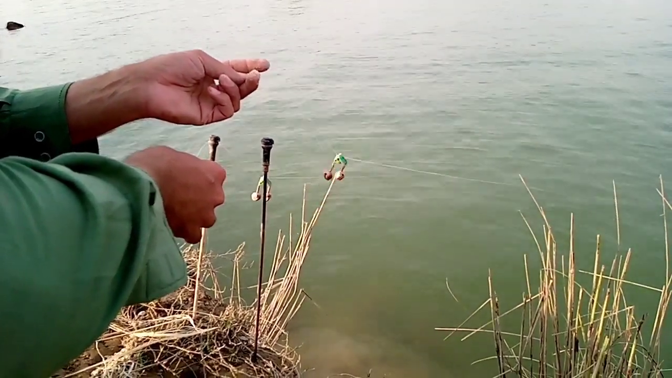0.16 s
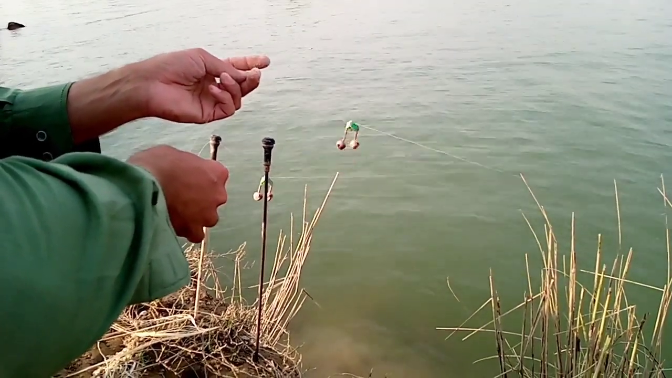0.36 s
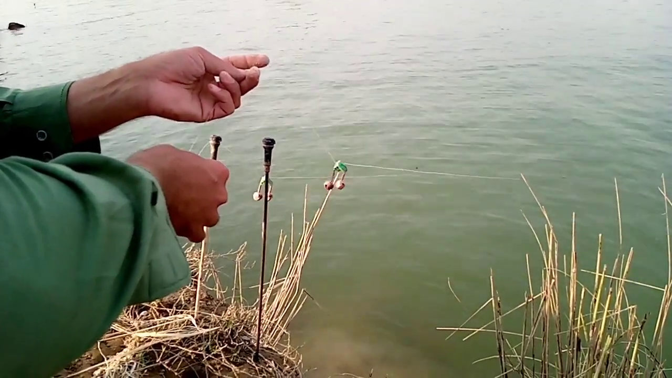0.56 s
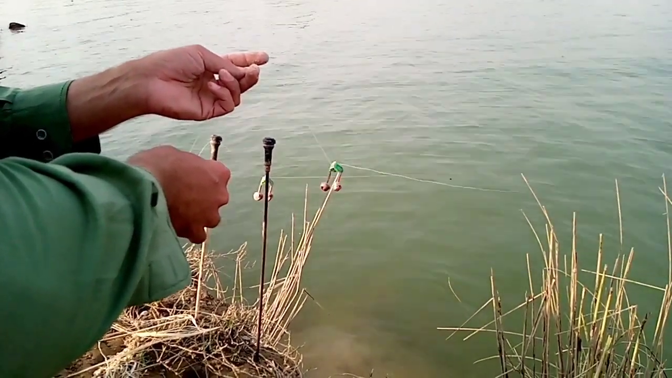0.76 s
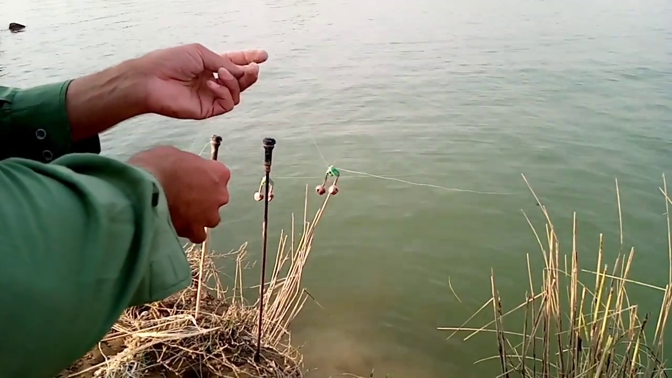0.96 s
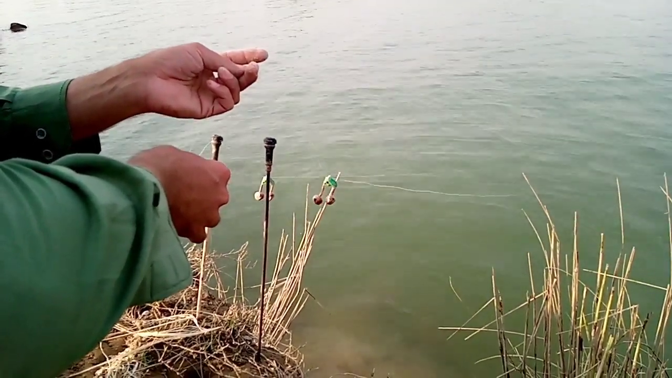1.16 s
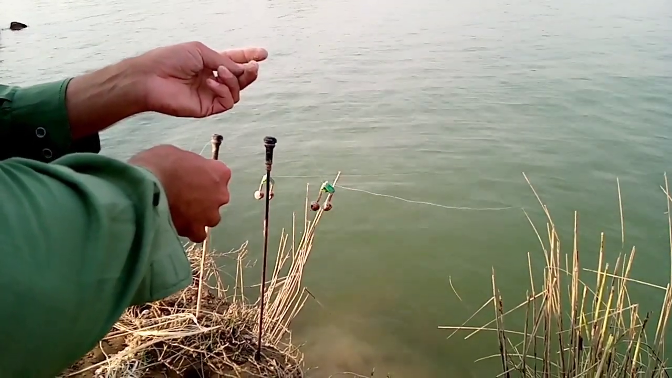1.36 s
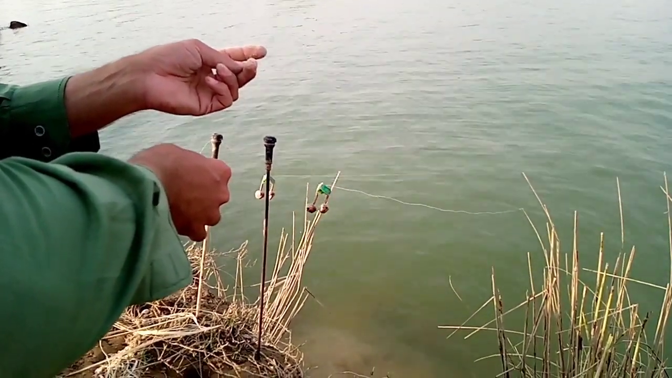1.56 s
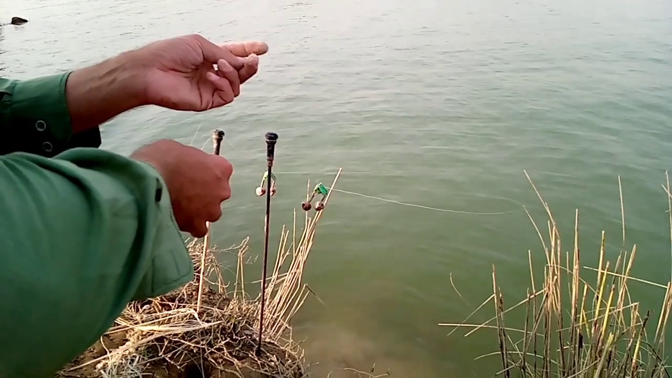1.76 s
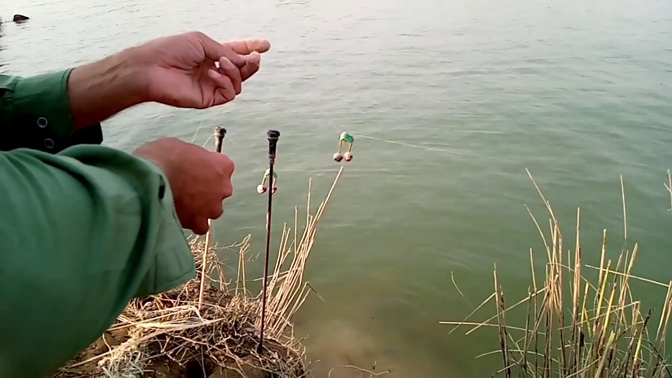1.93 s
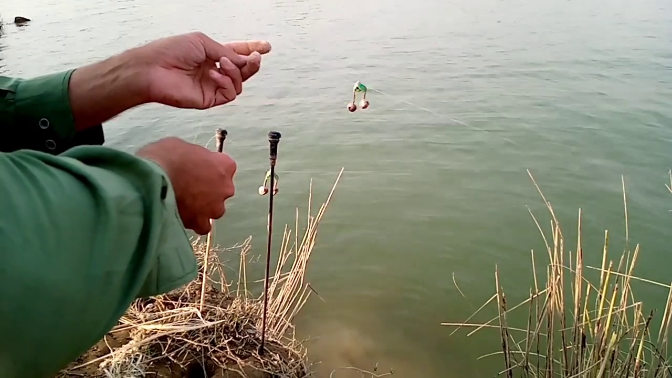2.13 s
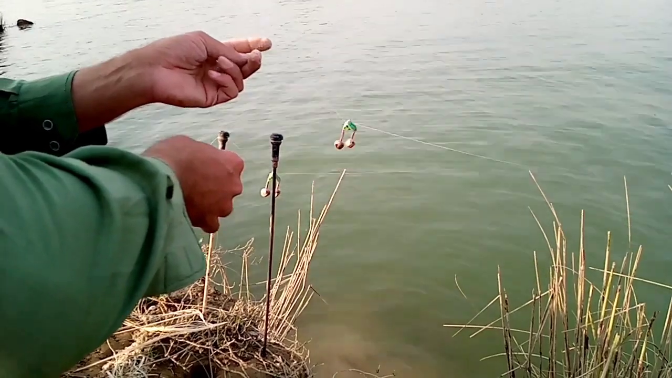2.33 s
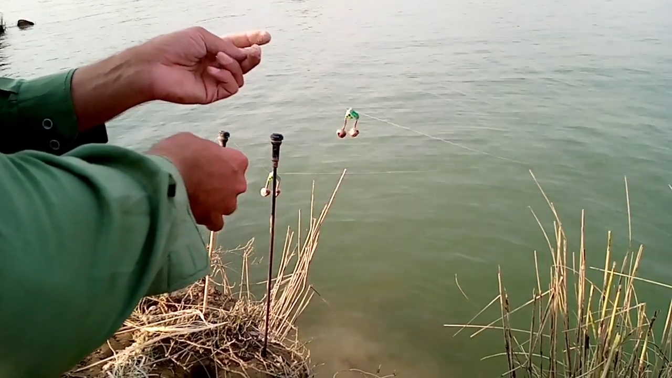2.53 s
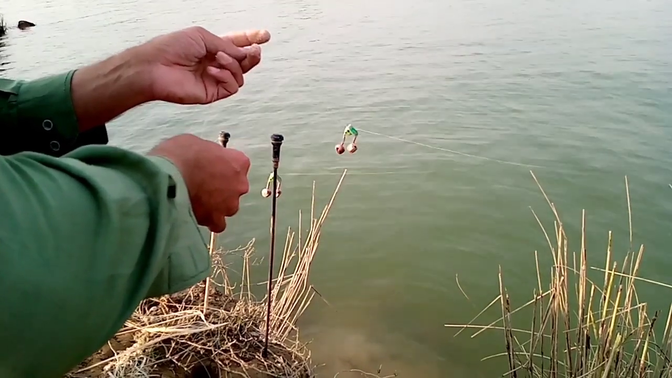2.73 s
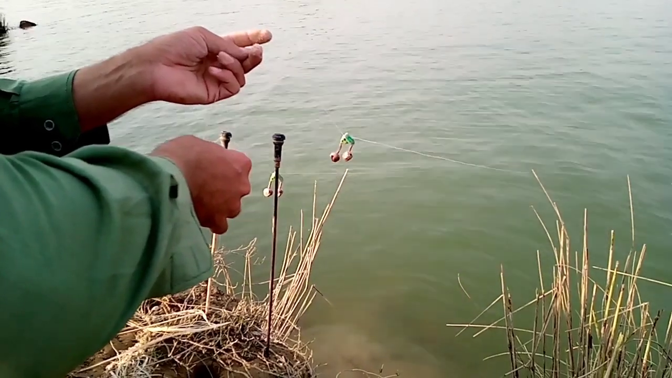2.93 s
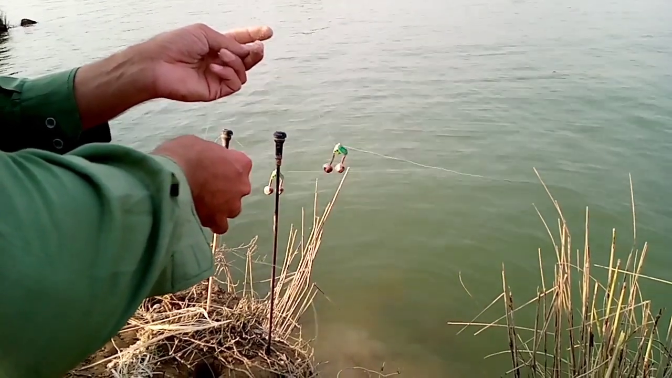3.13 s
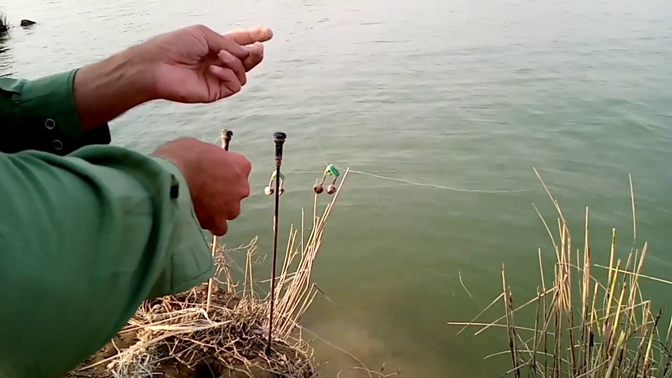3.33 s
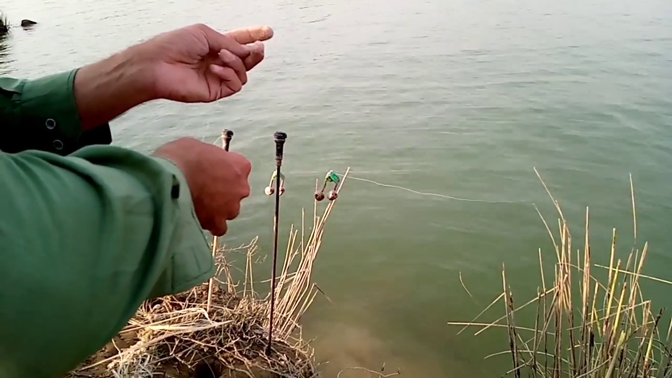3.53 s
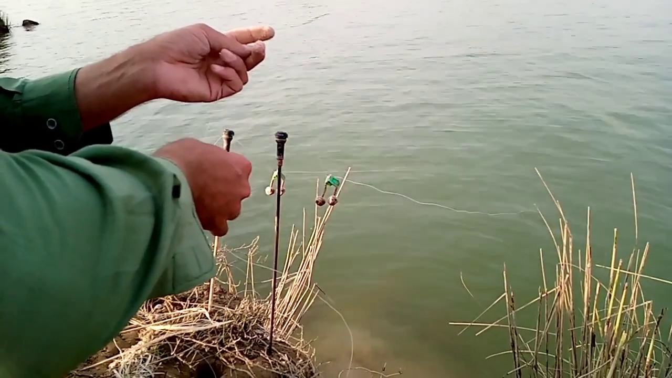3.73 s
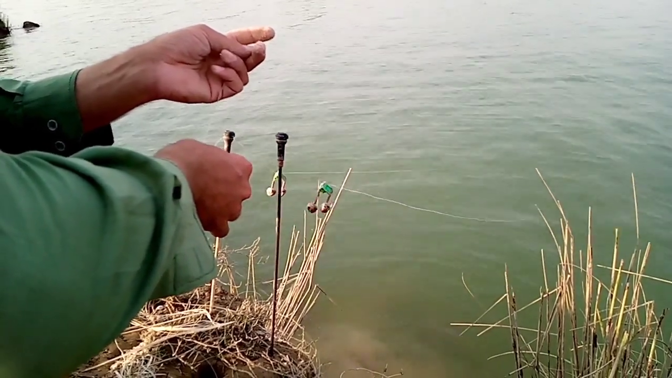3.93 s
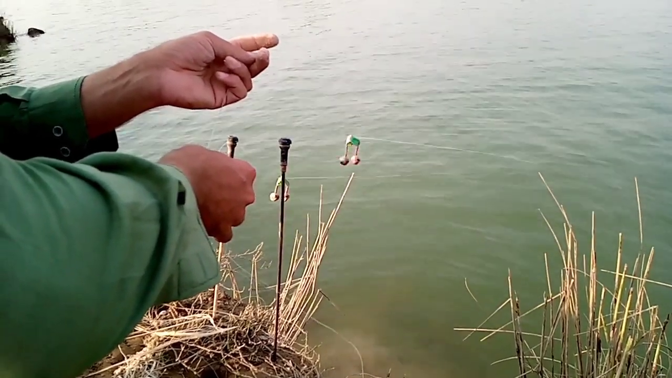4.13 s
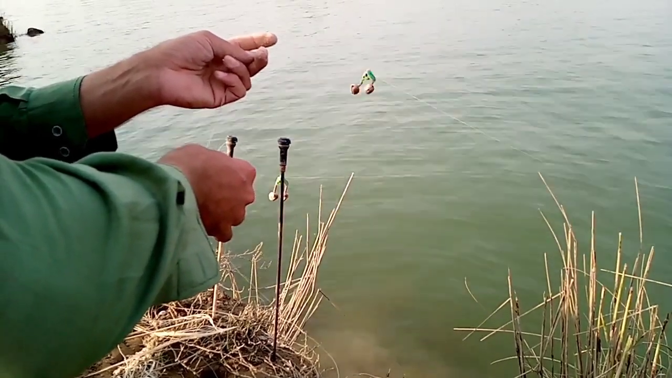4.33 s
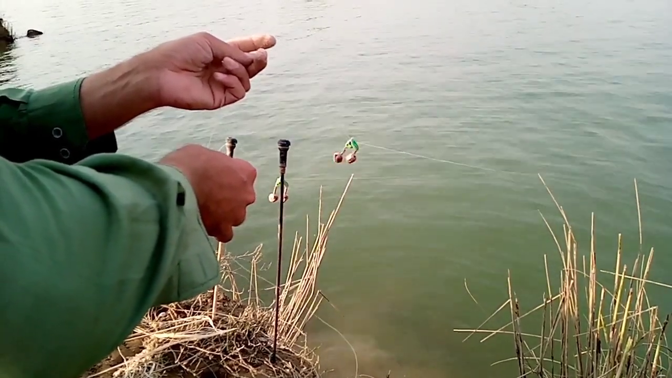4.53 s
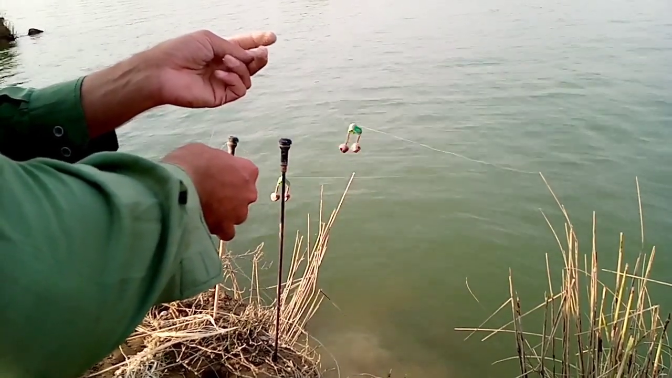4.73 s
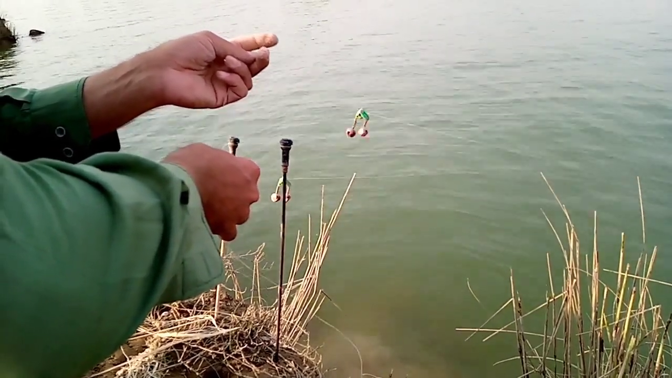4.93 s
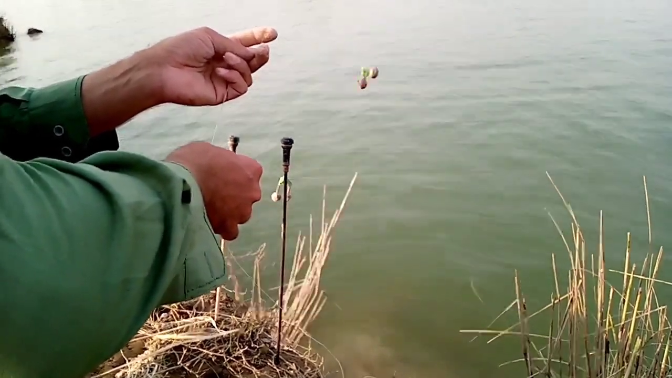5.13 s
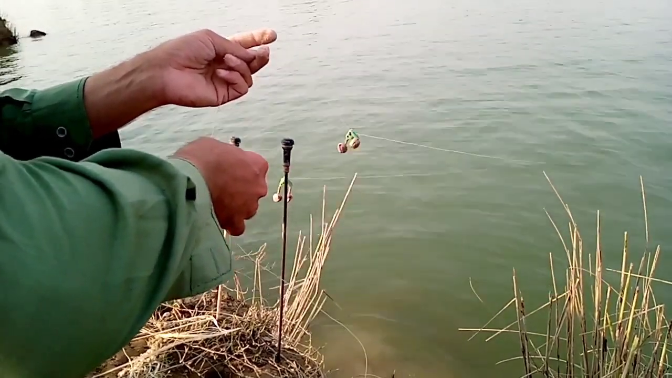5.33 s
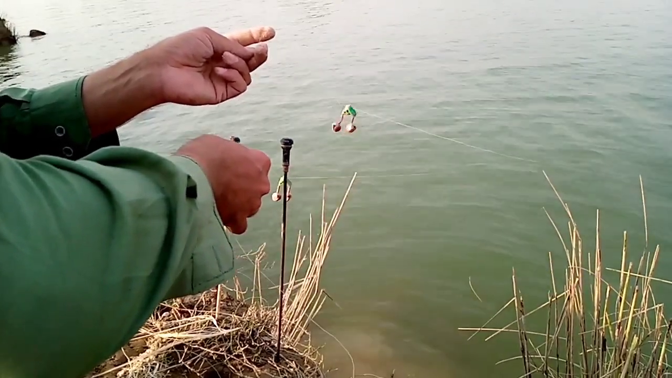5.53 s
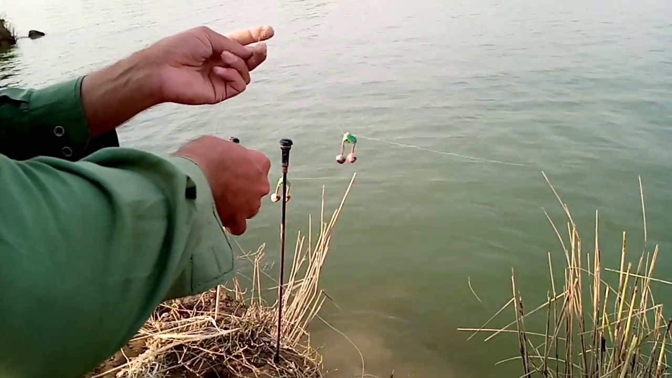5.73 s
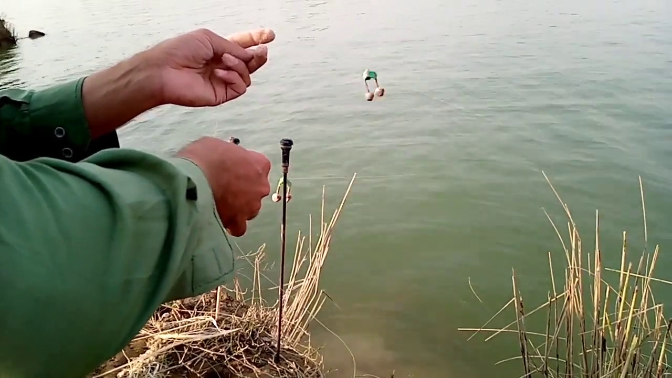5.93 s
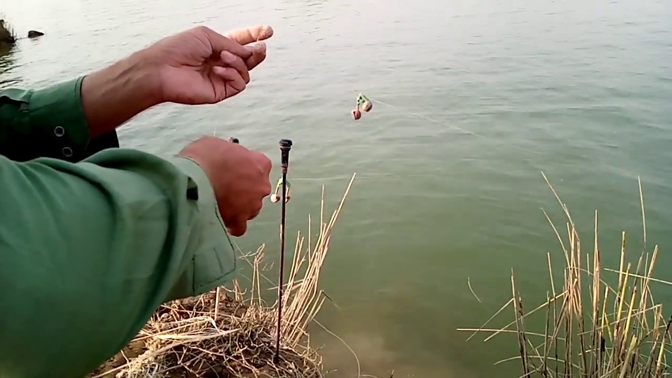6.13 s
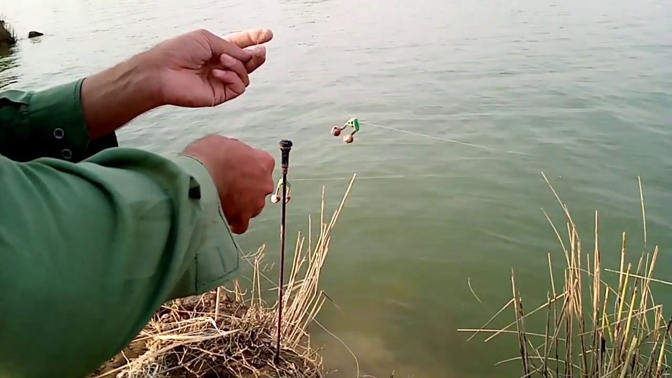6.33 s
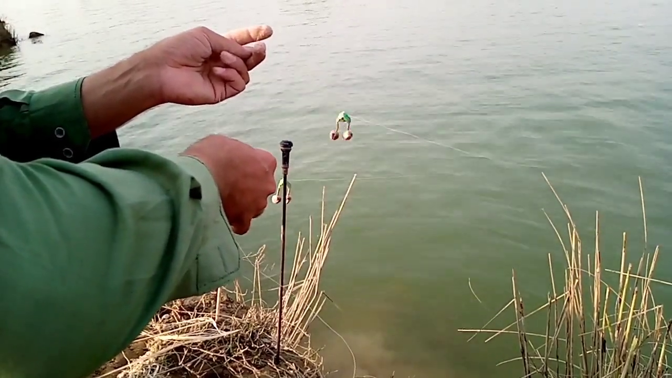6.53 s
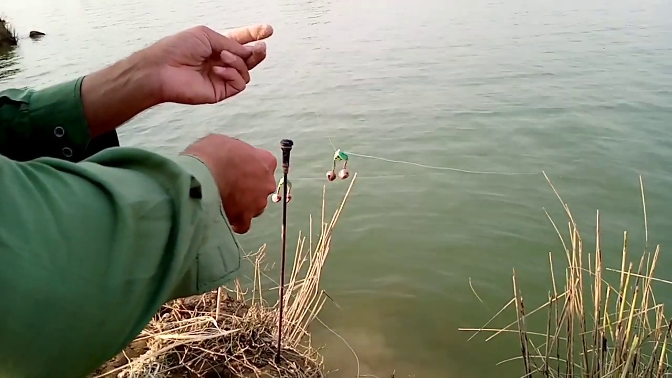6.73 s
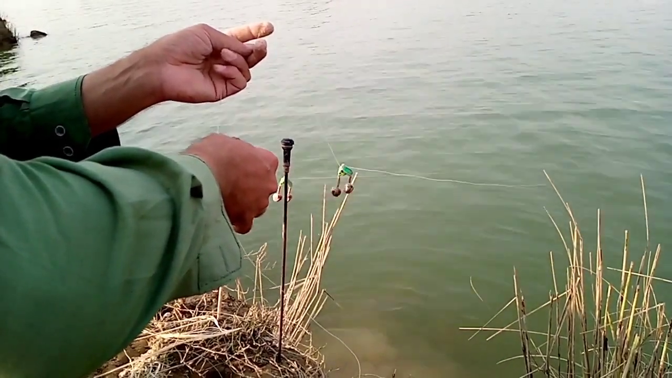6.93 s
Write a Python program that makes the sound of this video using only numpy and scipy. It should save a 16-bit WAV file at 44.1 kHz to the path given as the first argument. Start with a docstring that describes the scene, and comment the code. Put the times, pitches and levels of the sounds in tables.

```python
"""Two small pellet bells on a fishing line jingle in bursts as the line is twitched.
Each contact adds a skipping metal clack and a ring of four shell modes, whose two lower ones
are damped by the next contact while the overtones ring on. Gliding sines make cricket chirps and
an insect trill, noise puffs make dry reed ticks, and rising sine bubbles make lapping ripples.
Shaped noise gives open air, rustle and a low rumble, with faint whistles and one bird note far off."""
import sys
import numpy as np
from scipy import signal
from scipy.fft import rfft, irfft, next_fast_len
from scipy.io import wavfile
from scipy.ndimage import map_coordinates

SR = 44100
rng = np.random.default_rng(int(sys.argv[2]) if len(sys.argv) > 2 else 0)


def wav_record(signal):
    """Record a signal, one row per channel, as 16-bit PCM in the file named by sys.argv[1]."""
    frames = np.transpose(np.atleast_2d(signal))
    bounded = np.clip(frames, -1, 1)
    # unit amplitude maps onto the largest positive 16-bit level
    quanta = np.round(bounded * 32767).astype(np.int16)
    wavfile.write(sys.argv[1], SR, quanta)


N = 308259
TIME = np.arange(N) / SR


def from_db(db):
    """Decibels to gain."""
    return 10 ** (np.asarray(db) / 20)


def rms_one(x):
    """Scale to unit rms."""
    return x / np.sqrt(np.mean(x ** 2) + 1e-20)


def add(out, start_s, sound):
    """Mix a sound in at its start time."""
    at = min(max(round(start_s * SR), 0), N)
    out[at:at + len(sound)] += sound[:N - at]


def seconds(length_s):
    """Time axis of a short sound."""
    return np.arange(max(int(length_s * SR), 8)) / SR


def dying(t, t60):
    """Exponential decay that falls 60 dB in t60 seconds."""
    return np.exp(-np.log(1000) * t / max(t60, 1e-3))


def tone(hz):
    """A sine that follows a pitch curve from a random phase."""
    return np.sin(2 * np.pi * (np.cumsum(hz) / SR + rng.random()))


def drift(rate_hz, size=N):
    """Random curve: straight lines between normal draws at rate_hz."""
    knots = np.arange(size) / SR * rate_hz
    return map_coordinates(rng.standard_normal(int(knots[-1]) + 2), [knots], order=1)


def band(x, low_hz, high_hz):
    """Causal band-pass."""
    edges = [low_hz, min(high_hz, .45 * SR)]
    return signal.sosfilt(signal.butter(2, edges, "band", fs=SR, output="sos"), x)


def octave_noise(size, hz, octaves):
    """Unit-rms noise in a band given by centre and width in octaves."""
    half = 2 ** (octaves / 2)
    return rms_one(band(rng.standard_normal(size), hz / half, hz * half))


def resonate(x, hz, width_hz):
    """One resonance with gain 1 on top."""
    r = np.exp(-np.pi * width_hz / SR)
    poles = [1, -2 * r * np.cos(2 * np.pi * hz / SR), r * r]
    return signal.lfilter(np.array([1, 0, -1]) * (1 - r * r) / 2, poles, x)


def coloured_noise(spectrum):
    """Noise of unit rms with a given spectrum."""
    hz, db = np.transpose(spectrum)
    size = next_fast_len(N)
    bins = np.maximum(np.fft.rfftfreq(size, 1 / SR), 1)
    gain = from_db(np.interp(np.log(bins), np.log(hz), db))
    return rms_one(irfft(rfft(rng.standard_normal(size)) * gain, size)[:N])


# colour of the open air over the water: (f/Hz, relative level/dB)
AIR_SPECTRUM = [(160, -51), (280, -7), (830, -17), (1290, -28.5), (1900, -11.5), (2990, -21.5),
                (3910, -12.5), (4330, -10), (4700, -12), (5660, -15.5), (6810, 5.5), (7530, -17.5),
                (8470, -22.5), (15500, -25.5)]
# colour of the low rumble: (f/Hz, relative level/dB)
RUMBLE_SPECTRUM = [(13, -46.5), (22, -25), (27, -15), (49, -15), (108, 3.5), (136, 1), (249, -19),
                   (400, -29.5), (520, -38), (880, -120)]
# swell of the rumble, before its trim and lumps: (t/s, level/dB)
RUMBLE_SWELL = [(0.05, -64.5), (1.25, -69), (1.42, -63.5), (1.88, -69.5), (2.15, -63), (3.64, -69.5),
                (3.75, -62.5), (3.92, -76.5), (3.96, -65.5), (4.55, -73), (4.78, -59), (4.89, -70),
                (5.74, -64.5), (6.04, -73.5), (6.1, -63), (6.9, -70)]
# low hum within the rumble: (mean f/Hz, median sine peak/dB against the rumble's rms)
RUMBLE_HUM = [(64, -8), (97, -4)]


def background(air_db=-70, air_flicker_db=0.5, rumble_trim_db=-0.5, hum_waver=0.034):
    """Soft noise hiss of open air over a lumpy noise rumble with wavering sine hums."""
    air = from_db(air_db + air_flicker_db * drift(12)) * coloured_noise(AIR_SPECTRUM)
    hum = sum(from_db(db + 1.3 * drift(41)) * tone(hz * (1 + hum_waver * drift(36)))
              for hz, db in RUMBLE_HUM)
    lumps_db = 2.2 * drift(15)
    rumble_db = np.interp(TIME, *np.transpose(RUMBLE_SWELL)) + rumble_trim_db + lumps_db
    return air + from_db(rumble_db) * (coloured_noise(RUMBLE_SPECTRUM) + hum)


# uneven rustle of reeds farther along the bank: (band centre f/Hz, median level/dB)
RUSTLE_BANDS = [(420, -93.5), (560, -92), (850, -88.5), (1150, -93), (1500, -86.5), (1950, -86.5),
                (2600, -87.5), (3400, -86)]


def far_rustle(slow_db=4, slow_hz=9, fast_db=3, fast_hz=35, octaves=0.43):
    """Each noise band of the rustle swells and flutters on its own."""
    out = np.zeros(N)
    for hz, db in RUSTLE_BANDS:
        level_db = db + slow_db * drift(slow_hz) + fast_db * drift(fast_hz)
        out += from_db(level_db) * octave_noise(N, hz, octaves)
    return out


# overlapping runs of a few high and low crickets:
# (first chirp t/s, last chirp t/s, first f/Hz, last f/Hz, level/dB before level_db)
CRICKET_RUNS = [(0, 0.333, 7320, 7310, -67.5), (0.776, 1.677, 7140, 7410, -68),
                (1.965, 2.959, 7150, 7340, -67), (3.042, 3.731, 6970, 7100, -64.5),
                (3.877, 4.533, 7300, 7310, -66), (4.638, 5.089, 6970, 6980, -62.5),
                (5.143, 5.79, 7280, 7350, -68), (5.847, 6.407, 6920, 6980, -65),
                (6.501, 6.938, 7350, 7300, -67), (0.949, 1.411, 7100, 7180, -69.5),
                (0, 0.131, 6850, 6930, -64), (0.315, 0.906, 6590, 6640, -65),
                (1.462, 2.306, 6750, 6850, -62), (2.652, 3.243, 6690, 6590, -63.5),
                (3.874, 4.459, 6620, 6600, -64.5), (4.99, 5.581, 6750, 6670, -62),
                (6.19, 6.79, 6780, 6640, -61.5)]


def crickets(level_db=5.0, chirp_gap_s=.115, stroke_hz=72, sweep=0.081, duty=0.71, uneven_db=-0.87,
             wander=0.0027, scatter_db=-8, scatter_t60=0.044, strokes=4):
    """Even chirps creep in pitch; each is four falling wing strokes, scattered by the reeds."""
    out = np.zeros(N)
    t = seconds(duty / stroke_hz)
    through = t / t[-1]
    for first, last, first_hz, last_hz, db in CRICKET_RUNS:
        chirps = round((last - first) / chirp_gap_s) + 1
        times, pitches = np.linspace(first, last, chirps), np.linspace(first_hz, last_hz, chirps)
        for start, hz in zip(times, pitches):
            pitch = hz * (1 + wander * rng.normal() + sweep * (.5 - through))
            for k in range(strokes):
                gain = from_db(db + level_db + uneven_db * rng.normal())
                add(out, start + k / stroke_hz, gain * tone(pitch) * np.sin(np.pi * through))
    t = seconds(.1)
    echoes = rng.standard_normal(len(t)) * dying(t, scatter_t60)
    scatter = signal.fftconvolve(out, echoes / np.linalg.norm(echoes))[:N]
    return out + from_db(scatter_db) * scatter


# shimmer of farther insects: (f/Hz, width/Hz, median level/dB)
INSECT_CHORUS = [(6550, 350, -76.5), (6980, 290, -87)]
# thin insect trill: (start t/s, end t/s)
INSECT_TRILLS = [(.95, 1.3), (3.35, 3.9), (6.0, 6.75)]


def far_insects(flutter_db=6.0, trill_hz=7950, trill_db=-78.5, pulse_hz=60):
    """Distant singers blur into noise bands; a thin pulsed sine trill swells and fades."""
    out = np.zeros(N)
    for hz, width, db in INSECT_CHORUS:
        blur = rms_one(band(rng.standard_normal(N), hz - width / 2, hz + width / 2))
        out += from_db(db + flutter_db * drift(130)) * blur
    for start, end in INSECT_TRILLS:
        t = seconds(end - start)
        stroke = t * pulse_hz % 1
        # pulses tend to fall in pitch, with a random wander
        pitch = trill_hz * (1 + .03 * (.5 - stroke) + .005 * drift(pulse_hz, len(stroke)))
        swell = np.sqrt(np.abs(np.sin(np.pi * t / t[-1])))
        add(out, start, from_db(trill_db) * swell * np.sin(np.pi * stroke) ** 2 * tone(pitch))
    return out


def bubble(hz):
    """A tiny bubble rings briefly and rises in pitch."""
    t = seconds(110 / hz)
    attack = np.minimum(t * hz / 10, 1)
    return tone(hz * (1 + .06 * t / t[-1])) * dying(t, t[-1]) * attack


def ripples(floor_db=-74.0, count=240):
    """Wavelets lap the bank: scattered bubbles of many sizes, a few of them louder."""
    out = np.zeros(N)
    for when, size, chance in rng.random((count, 3)):
        hz = 480 + 2900 * size ** 1.1
        boost_db = -2.2 * np.log(chance + .03)
        add(out, when * N / SR, from_db(floor_db + boost_db) * bubble(hz))
    return out


def burst(db, hz, octaves, t60):
    """A dying puff of noise in one band."""
    t = seconds(.3)
    return from_db(db) * octave_noise(len(t), hz, octaves) * dying(t, t60)


# dry ticks of reeds and line: (t/s, level before decay/dB, centre f/Hz, width/octaves, t60/s)
REED_TICKS = [(0.161, -44.5, 3500, 0.53, 0.012), (0.162, -60, 1140, 0.64, 0.18),
              (1.071, -41.5, 8500, 0.24, 0.0091), (1.307, -57.5, 1470, 0.95, 0.08),
              (1.835, -47, 3130, 1.15, 0.018), (1.836, -49.5, 2280, 0.22, 0.045),
              (3.039, -54.5, 4940, .28, 0.058), (3.662, -56.5, 3500, 0.91, 0.14),
              (4.283, -57, 5440, 0.69, 0.057), (4.568, -51.5, 4480, 1.5, 0.024),
              (4.901, -53, 5460, 0.2, 0.13), (6.036, -51.5, 3200, .58, .1)]
# soft bumps on the bank: (t/s, level before decay/dB, centre f/Hz, width/octaves, t60/s)
BANK_BUMPS = [(4.754, -54, 182, 1.2, 0.23), (5.602, -56, 180, 0.64, 0.24)]


def reeds(crack_db=-9, crack_hz=7000, crack_octaves=0.7, crack_t60=0.021):
    """Dry noise ticks, each a bright crack over its own band, and soft low bumps."""
    out = np.zeros(N)
    for start, db, hz, octaves, t60 in REED_TICKS:
        add(out, start, burst(db, hz, octaves, t60))
        add(out, start, burst(db + crack_db, crack_hz, crack_octaves, crack_t60))
    for start, db, hz, octaves, t60 in BANK_BUMPS:
        add(out, start, burst(db, hz, octaves, t60))
    return out


# bigger wavelets that patter: (start t/s, end t/s, middle bubble f/Hz, middle level/dB)
WAVELETS = [(0.161, 0.299, 1237, -68.5), (1.07, 1.299, 1223, -69), (4.204, 4.416, 1355, -69),
            (5.754, 5.981, 1194, -66)]


def laps(spread_octaves=0.81, spread_db=3, count=22):
    """Each bigger wavelet sheds a quick cluster of bubbles."""
    out = np.zeros(N)
    for start, end, hz, db in WAVELETS:
        for when in np.linspace(start, end, count):
            size, strength, late = rng.uniform(-1, 1, 3)
            drop = from_db(db + spread_db * strength) * bubble(hz * 2 ** (spread_octaves * size))
            add(out, when + late * (end - start) / count, drop)
    return out


# damped resonances of a shell with the pellet on it, before load shift and scatter:
# (f/Hz, width/Hz, relative level/dB)
LOADED_SHELL = [(3700, 270, -1.5), (3987, 79, -5.5), (4168, 117, 6), (4437, 213, 12), (4657, 157, 7),
                (5026, 530, -5.5), (5130, 640, -22), (6550, 160, -43), (7650, 45, -20), (8750, 23, -30),
                (10850, 89, -32.5)]


def clatter(top_hz, bounce_s=.0016, fade_s=0.055, skip=0.38, load_shift=0.049, lowest_hz=3250,
            snap_db=-37, snap_hz=9000, count=12):
    """The pellet lands, then skips in quick, weakening bounces; energy of 10 ms at rms 1."""
    t = seconds(.05)
    when = np.r_[0, np.cumsum(bounce_s * rng.uniform(.3, 1.7, count))]
    clicks = np.zeros(len(t))
    places = np.minimum(when * SR, len(t) - 1).astype(int)
    clicks[places] = dying(when, 2 * fade_s) * np.r_[1, rng.laplace(0, skip, count)]
    # each landing place loads the shell differently and favours other resonances
    shell = np.zeros(len(t))
    for k, (hz, width, db) in enumerate(LOADED_SHELL):
        gain = (-1) ** k * from_db(db + rng.normal())
        shifted_hz = hz * (1 + load_shift * (2 * rng.random() - 1))
        shell += gain * resonate(clicks, shifted_hz, width)
    # so small a shell radiates little outside the span of its modes, save a thin metal snap
    shell = signal.sosfilt(signal.butter(6, [lowest_hz, top_hz], "band", fs=SR, output="sos"), shell)
    shell = rms_one(shell) + from_db(snap_db) * rms_one(band(clicks, snap_hz, SR / 2))
    return shell / np.sqrt(np.sum(shell ** 2) / (SR / 100))


# shell modes of each bell, before detune: (low f/Hz, main f/Hz, upper f/Hz, top f/Hz)
BELL_MODES = [(3827, 4225, 8400, 10425), (3818, 4180, 9150, 10320)]
# middle overtone levels against the stronger of the two lowest modes: (upper level/dB, top level/dB)
OVERTONES = [-33.5, -37.5]
# clack against the ring at a medium blow, and its growth in dB per dB of force
MEDIUM_BLOW_DB, CLACK_DB, CLACK_GROWTH = -35, -14.5, 0.2
# a pellet that stays on the shell chokes the ring and clacks more: dB per halving of a usual t60
CHOKE_DB, USUAL_T60_S = 0.5, 0.059
# a harder blow is a shorter contact: top of the clack at a medium blow, and its rise with force
CLACK_TOP_HZ, TOP_OCTAVES_PER_DB = 8300, .025


def strike(bell, db, low_db, t60, free_s, glance_db, attack_s=0.00088, damp_t60=0.0033, detune=0.0025,
           kick=0.36, kick_t60=0.027, overtone_spread_db=7, overtone_t60=0.079):
    """The pellet damps the two lower shell modes after free_s; harder blows clack more."""
    t = seconds(.2)
    hz = np.array(BELL_MODES[int(bell > .5)]) * (1 + detune * rng.normal())
    attack = 1 - np.exp(-(t / attack_s) ** 2)
    modes = np.sin(2 * np.pi * (hz[:, None] * t + rng.random((len(hz), 1)))) * attack
    shares = np.array([from_db(low_db), 1]) / np.hypot(from_db(low_db), 1)
    damping = dying(np.maximum(t - free_s, 0), damp_t60)
    body = shares @ modes[:2] * dying(t, t60) * damping
    # the ring drops quickly while the pellet still touches the shell
    body = body * (1 + kick * dying(t, kick_t60)) / (1 + kick / 4)
    # the overtones vary with the landing place and ring on through later contacts
    overtone_db = np.array(OVERTONES) + overtone_spread_db * rng.uniform(-1, 1, 2)
    shimmer = from_db(overtone_db) @ modes[2:] * dying(t, overtone_t60)
    force_db = db - MEDIUM_BLOW_DB
    top_hz = np.clip(CLACK_TOP_HZ * 2 ** (TOP_OCTAVES_PER_DB * force_db), SR / 8, SR / 3)
    choke_db = CHOKE_DB * np.log2(USUAL_T60_S / t60)
    clack = from_db(CLACK_DB + CLACK_GROWTH * force_db + choke_db + glance_db) * clatter(top_hz)
    sound = body + shares.max() * shimmer
    add(sound, 0, clack)
    return from_db(db) * sound


# light rattling while the line moves: (start t/s, end t/s, contacts, median level/dB)
LIGHT_RATTLES = [(0.175, 0.276, 4, -59.5), (2.143, 2.289, 9, -43), (2.679, 2.953, 4, -56),
                 (4.429, 4.47, 3, -48), (4.921, 5.006, 4, -51), (5.186, 5.299, 6, -49),
                 (5.566, 5.741, 8, -46), (6.022, 6.215, 12, -43.5), (6.288, 6.52, 15, -41),
                 (6.596, 6.655, 3, -49.5)]


def rattles(t60=0.069, low_db=-17.5, landing_db=7, spread_db=2.5, glancing_db=5):
    """Light glancing contacts, unevenly spaced, on either bell, with extra clack."""
    out = np.zeros(N)
    for start, end, contacts, db in LIGHT_RATTLES:
        gap = (end - start) / round(contacts)
        for k in range(round(contacts)):
            late, bell = rng.random(2)
            force, landing = rng.standard_normal(2)
            low_mode_db = low_db + landing_db * landing
            sound = strike(bell, db + spread_db * force, low_mode_db, t60, gap, glancing_db)
            add(out, start + (k + late) * gap, sound)
    return out


# clear pellet strikes: (t/s, bell 0 or 1, level/dB, low mode against main mode/dB, ring t60/s)
CLEAR_STRIKES = [(.492, 1, -56.5, -15, .02), (.544, 0, -50.5, -29, .03), (0.773, 0, -56, -19, 0.043),
                 (0.921, 0, -55, -24, 0.083), (1.175, 0, -53, -21, 0.038), (1.303, 0, -56, -26, 0.043),
                 (1.436, 0, -53, -27, 0.047), (1.78, 0, -51.5, -24, 0.036), (1.855, 0, -51.5, -10, 0.032),
                 (1.994, 1, -37, -30, 0.11), (2.049, 1, -44, -18, .13), (2.085, 1, -37.5, -3, 0.13),
                 (2.094, 1, -29, -8, 0.091), (2.113, 1, -28, -16, 0.11), (2.204, 0, -38, -25, 0.11),
                 (2.231, 0, -33, -13, 0.11), (2.254, 1, -32, -24, 0.061), (2.271, 1, -37, -15, 0.032),
                 (2.33, 0, -39, 10, .13), (2.39, 0, -41.5, 13, 0.071), (2.528, 0, -44, -7, .13),
                 (2.569, 0, -43.5, -13, .12), (2.662, 1, -45.5, -6, 0.074), (2.744, 0, -42, -4, 0.078),
                 (2.796, 0, -43, 4, 0.085), (2.841, 0, -43.5, -4, 0.049), (3.947, 0, -46.5, -12, 0.043),
                 (3.972, 0, -45, -18, 0.047), (4.25, 1, -37.5, -22, 0.077), (4.28, 0, -49, 5, .22),
                 (4.357, 0, -50.5, -4, 0.46), (4.395, 0, -41, -25, 0.21), (4.425, 1, -31.5, -16, 0.02),
                 (4.438, 1, -31, -20, 0.012), (4.452, 1, -34.5, -17, 0.028), (4.571, 0, -36, 13, 0.045),
                 (4.598, 0, -37, 20, 0.051), (4.646, 1, -39, 15, 0.071), (4.671, 0, -40, 4, 0.14),
                 (4.771, 0, -46, 0, 0.092), (4.838, 0, -53, 2, 0.098), (4.99, 0, -38.5, 12, 0.16),
                 (5.019, 1, -34.5, -11, 0.13), (5.171, 0, -34.5, -6, 0.17), (5.195, 1, -27, -20, 0.15),
                 (5.209, 1, -29.5, -22, 0.23), (5.225, 0, -17.5, -3, 0.032), (5.232, 1, -21, 3, 0.04),
                 (5.25, 0, -28, 3, 0.036), (5.313, 1, -33, -19, 0.025), (5.381, 0, -32.5, 8, 0.042),
                 (5.401, 0, -39, 20, 0.033), (5.48, 1, -34.5, 7, 0.12), (5.558, 1, -31.5, -16, 0.066),
                 (5.602, 1, -31.5, -22, .09), (5.621, 1, -35.5, -15, 0.13), (5.672, 1, -40.5, -6, 0.24),
                 (5.705, 1, -37.5, -6, 0.066), (5.771, 0, -52.5, 10, .04), (6.0, 0, -42, -6.5, 0.16),
                 (6.036, 0, -44, -18, 0.059), (6.056, 0, -27.5, 20, 0.011), (6.091, 0, -27.5, 9, 0.067),
                 (6.113, 1, -33, 14, 0.15), (6.14, 1, -20.5, -16, 0.14), (6.159, 1, -27.5, -10, 0.037),
                 (6.171, 0, -20.5, -2, 0.046), (6.196, 0, -24.5, 11, 0.019), (6.235, 0, -40.5, 4, .1),
                 (6.292, 0, -41, -25, .04), (6.301, 1, -29, -25, 0.065), (6.318, 0, -29.5, -22, 0.14),
                 (6.332, 0, -36, 10, 0.022), (6.375, 0, -30, 11, 0.052), (6.401, 1, -25.5, -34, 0.021),
                 (6.422, 1, -24.5, 1, 0.0085), (6.45, 1, -32.5, 7, 0.073), (6.492, 1, -38.5, -5, 0.063),
                 (6.518, 0, -40, -1.5, 0.21), (6.603, 1, -39, -3, 0.045), (6.647, 0, -40, -4, 0.077),
                 (6.687, 0, -29.5, -9, 0.1), (6.767, 0, -50.5, 6, 0.092), (6.81, 1, -52, 7, 0.12)]


def bells():
    """Each clear strike damps the two lower modes of the old ring and starts a new one."""
    out = np.zeros(N)
    gaps = np.diff([row[0] for row in CLEAR_STRIKES], append=N / SR)
    for (start, bell, db, low_db, t60), gap in zip(CLEAR_STRIKES, gaps):
        add(out, start, strike(bell, db, low_db, t60, gap, 0))
    return out


# faint breathy whistles: (start t/s, end t/s, first f/Hz, last f/Hz, peak level of the core/dB)
WHISTLE_GLIDES = [(0.578, 1.023, 2300, 1623, -69.5), (1.014, 1.286, 1400, 1450, -66),
                  (1.05, 1.501, 1750, 2510, -70), (2.555, 2.623, 900, 933, -71.5),
                  (2.657, 2.947, 1750, 1605, -70.5), (3.804, 4.292, 1850, 1525, -72.5),
                  (4.198, 4.344, 780, 952, -73.5), (4.214, 4.313, 1550, 1360, -65.5),
                  (5.675, 6.005, 1850, 1720, -70), (6.645, 6.897, 1430, 1408, -71)]
# a small bird's falling, growing note: (t/s, f/Hz, level/dB)
BIRD_NOTE = [(6.88, 3800, -100), (6.909, 3730, -76), (6.943, 3710, -72), (6.985, 3490, -62.5)]


def far_whistles(waver=0.0516, waver_hz=600, blur=0.0835, blur_db=-2):
    """Glides that swell and fade, each a wavering core in a blurred halo, and one clean bird note."""
    out = np.zeros(N)
    for start, end, first_hz, last_hz, db in WHISTLE_GLIDES:
        size = len(seconds(end - start))
        pitch = np.geomspace(first_hz, last_hz, size)
        core = tone(pitch * (1 + waver * drift(waver_hz, size)))
        halo = tone(pitch * (1 + blur * drift(waver_hz / 2, size))) * drift(waver_hz / 2, size)
        swell = np.sin(np.linspace(0, np.pi, size))
        add(out, start, from_db(db) * swell * (core + from_db(blur_db) * halo))
    t, hz, db = np.transpose(BIRD_NOTE)
    bird = from_db(np.interp(TIME, t, db)) * tone(np.interp(TIME, t, hz))
    return out + bird * (TIME > t[0])


def bank_echo(x, echo_db=-28):
    """Weak scatter from the ground and the angler: a dying noise tail after 4 ms."""
    t = seconds(.2)
    echoes = rng.standard_normal(len(t)) * dying(t, t[-1]) * (t > .004)
    return x + from_db(echo_db) * signal.fftconvolve(x, echoes / np.linalg.norm(echoes))[:N]


def scene():
    """Bells and reeds close by, with their echo, and the bank around them."""
    far = background() + far_rustle() + crickets() + far_insects()
    far = far + ripples() + laps() + far_whistles()
    near = reeds() + rattles() + bells()
    return (far + bank_echo(near))[None]


def record(dry, cutoff_hz=15700):
    """The microphone has a resonant peak at the top of its range; then a steep cut."""
    bright = dry + 2 * resonate(dry, 15300, 800)
    return signal.sosfilt(signal.ellip(10, .3, 70, cutoff_hz, fs=SR, output="sos"), bright)


dry = scene()
out = record(dry)
wav_record(out)
```